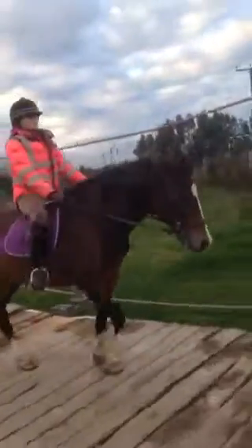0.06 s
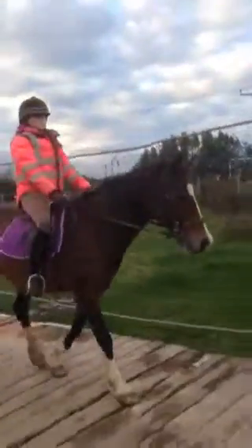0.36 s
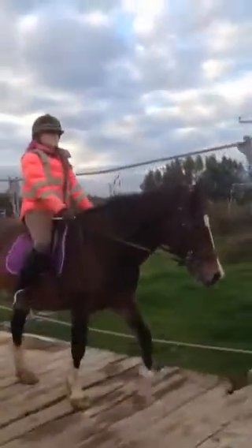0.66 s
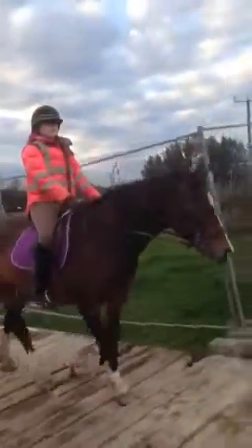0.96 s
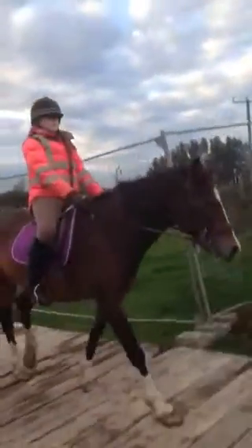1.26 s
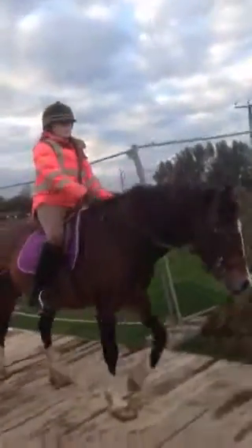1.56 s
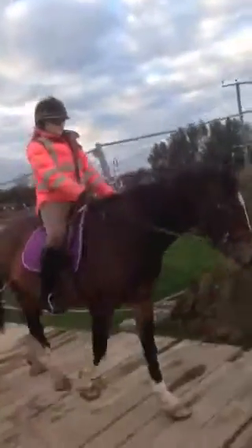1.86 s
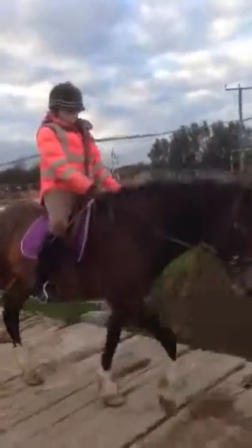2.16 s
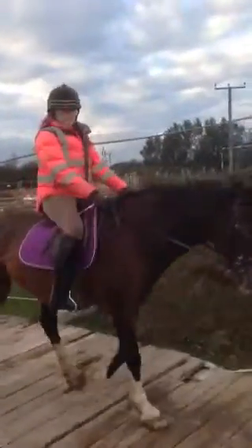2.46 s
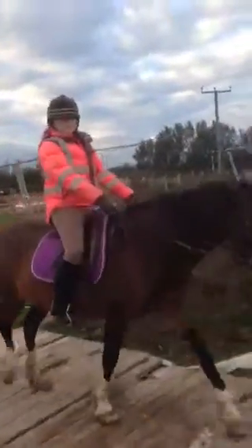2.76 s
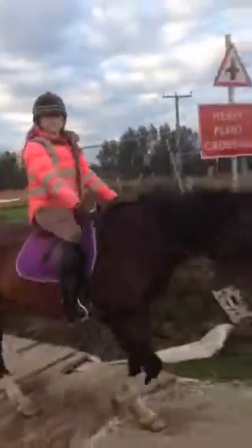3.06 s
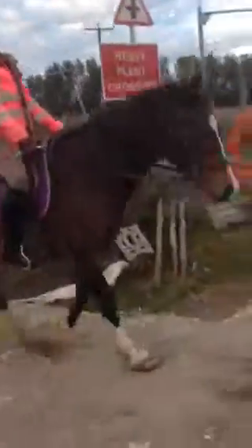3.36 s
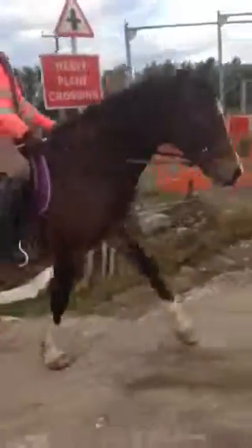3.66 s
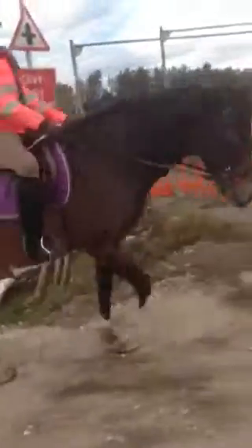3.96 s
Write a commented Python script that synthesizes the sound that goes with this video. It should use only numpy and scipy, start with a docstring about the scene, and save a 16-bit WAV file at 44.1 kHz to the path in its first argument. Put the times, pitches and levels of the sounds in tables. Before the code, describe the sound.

Horse hooves clop over loose planks and onto gritty ground as wind buffets the microphone.

```python
"""An outdoor deck of loose wooden boards, with a horse walking across it close to the microphone.
Each hoof sounds a hollow, falling knock over the wood; boards clap back or sink and boom.
The horse steps off onto ground where grit ticks and crunches; tack pings and rubs faintly.
Low gusts buffet the microphone, and a quiet hiss lies far behind it all."""
import sys
import numpy as np
from scipy import signal
from scipy.fft import rfft, irfft
from scipy.io import wavfile

SR = 44100
rng = np.random.default_rng(int(sys.argv[2]) if len(sys.argv) > 2 else 0)


def unload_wav(signal):
    """Save mono or channel-first audio to the path in sys.argv[1] as 16-bit WAV at rate SR, clipped to [-1, 1]."""
    wavfile.write(
        sys.argv[1],
        SR,
        np.round(np.clip(np.atleast_2d(signal).T, -1, 1) * 32767).astype(np.int16),
    )


N = 176400
T = np.arange(N) / SR
AGE = T[:SR // 3]  # time since an event

# distant outdoor hiss: t/s, relative level/dB
HISS_LEVELS = [(0.0, -60.5), (1.1, -59.5), (2.14, -60), (2.94, -57), (3.23, -59.5), (4.0, -56)]
# its spectrum: f/Hz, relative level/dB
HISS_COLOUR = [(25, -10), (200, 4.5), (700, 2.5), (1200, -3), (2000, -6.5), (3200, -11), (4400, -12),
               (6000, -17), (9000, -20), (15500, -21)]
# steady wind at the microphone: t/s, relative level/dB
RUMBLE_LEVELS = [(0, -53), (.35, -48.5), (.58, -49.5), (.9, -42), (1.4, -44), (1.95, -51.5), (2.8, -54.5),
                 (3.05, -44.5), (3.3, -43), (3.65, -46), (4, -59.5)]
# gusts on the microphone: peak t/s, Gaussian width/s, relative level/dB, flutter f/Hz
GUSTS = [(0.053, 0.013, -31, 131), (0.109, 0.022, -30, 187.9), (0.157, 0.0071, -24.5, 126.2),
         (0.184, 0.012, -28.5, 135.2), (0.224, 0.028, -37, 104), (0.437, 0.016, -37, 92.3),
         (0.487, 0.011, -31, 131), (0.663, 0.0056, -34, 122.8), (0.749, 0.026, -34, 200),
         (1.067, 0.012, -38.5, 128.4), (1.127, 0.028, -35.5, 187.4), (1.182, 0.008, -27, 121.9),
         (1.23, 0.012, -24.5, 187.7), (1.268, 0.019, -24, 142), (1.448, 0.016, -26.5, 111.3),
         (1.666, 0.0064, -27, 119), (1.697, 0.0073, -27, 246), (1.735, 0.014, -29, 132.4),
         (1.812, 0.025, -32.5, 161.9), (1.885, 0.0081, -25, 145.2), (2.301, 0.015, -30.5, 151.6),
         (2.999, 0.01, -31.5, 160.9), (3.075, 0.02, -36.5, 121), (3.14, 0.02, -36.5, 93.5),
         (3.201, 0.012, -33.5, 69.2), (3.351, 0.019, -28.5, 108), (3.425, 0.012, -29.5, 90),
         (3.502, 0.016, -20.5, 145), (3.614, 0.0081, -33, 69)]
# spectra of steady wind, gusts and the brighter flurry of strong gusts: f/Hz, relative level/dB
RUMBLE_COLOUR = [(20, -17), (50, 11), (90, 8), (200, -1.5), (400, -36), (900, -45.5)]
GUST_COLOUR = [(25, -50), (55, -2), (110, 1), (200, -2.5), (300, -9), (450, -25.5), (700, -38.5),
               (1400, -104.5)]
FLURRY_COLOUR = [(60, -24), (250, -12), (450, 14), (700, -19), (1400, -80)]
# metal rings on the tack: t/s, f/Hz, level/dB, overtone level/dB
TACK_PINGS = [(.918, 6002, -74, -68), (0.983, 6002, -53, -67), (1.568, 5990, -54, -70),
              (2.619, 5370, -64, -82)]
# grit, buckles and the sharp crack of some hoof knocks tick: t/s, level/dB, centre f/Hz
TICKS = [(0.0715, -34, 3960), (.513, -50.5, 7000), (.740, -33, 2480), (0.917, -46, 4080), (.935, -45, 4100),
         (0.948, -49.5, 4200), (1.189, -41, 2740), (1.3454, -31.5, 2400), (1.416, -21.5, 507),
         (1.9839, -27.5, 2470), (2.185, -43.5, 2570), (2.6053, -40, 1820), (2.896, -38.5, 5450),
         (2.912, -44, 6000), (3.061, -38.5, 3060), (3.3225, -21.5, 6700), (3.3292, -17.5, 3230),
         (3.338, -21, 3940), (3.355, -29, 2480), (3.662, -30, 3800), (3.716, -45.5, 8300)]
# saddle and jacket rub, hooves crush grit, hooves skim boards: t/s, hold/s, level/dB
RUSTLES = [(.165, 0.094, -61)]
CRUNCHES = [(1.984, .002, -39.5), (2.895, 0.013, -45.5), (3.324, 0.012, -32.5), (3.339, 0.0073, -34),
            (3.356, 0.0019, -34.5), (3.538, 0.0084, -49), (3.661, 0.0085, -46), (3.779, 0.016, -38.5),
            (3.838, .008, -48.5), (3.938, .013, -38)]
SCUFFS = [(.271, 0.01, -38.5), (.282, 0.0088, -32.5), (.32, 0.07, -48.5), (.577, 0.0021, -35.5),
          (.697, 0.003, -47), (.843, 0.019, -33.5), (1.547, 0.021, -34.5), (3.062, 0.0032, -42)]
# spectra of those three: f/Hz, relative level/dB
RUSTLE_COLOUR = [(2000, -1.5), (3500, -13), (4400, -0.5), (5500, -17), (9000, -21)]
CRUNCH_COLOUR = [(300, 5.5), (700, 13), (1500, 8), (2500, 8.5), (3400, 1), (4700, 3.5), (6500, -4),
                 (11000, -8), (15500, -16)]
SCUFF_COLOUR = [(300, -8), (560, 3), (850, 2), (1300, -7), (1900, -18.5), (2800, -29), (8000, -50)]
# a board sinks under the weight: t/s, f/Hz, relative level/dB
BOARD_THUMPS = [(.149, 146, -26), (1.082, 151, -17), (1.411, 171.6, -5.5), (1.849, 121, -44),
                (3.477, 117.6, -8.5), (3.497, 159, -14.5)]
# its modes: frequency ratio, relative level/dB, t60/s
THUMP_MODES = [(1, 4.5, 0.032), (1.5, 0.5, 0.03), (2.3, -3.5, 0.03), (4.3, -16, 0.031)]
# a hoof rocks onto its toe, or a loose board claps back: t/s, f/Hz, level/dB, t60/s
BOARD_CLAPS = [(.149, 535, -36, 0.057), (.29, 587, -35, 0.25), (.3575, 669, -20.5, 0.031),
               (0.3833, 624, -25, 0.014), (.8335, 774, -20.5, 0.018), (0.86, 430, -24, 0.055),
               (1.353, 867, -13.5, .02), (2.3817, 435, -19.5, 0.043), (2.6064, 338, -17.5, 0.031),
               (2.6085, 880, -18, 0.046), (3.0975, 539, -20, 0.05)]
# upper modes of a clap: frequency ratio, relative level/dB
CLAP_MODES = [(1.31, -12), (1.72, -18.5), (2.25, -33)]
# hoof on boards: t/s, nominal hollow f/Hz, relative hollow level/dB, ring time factor,
# then relative level/dB in each of the five wood bands
HOOF_KNOCKS = [ (0.071, 818, -14.5, .8, -47, -31.5, -26, -31.5, -32.5),
               (0.3447, 663, -20, 0.9, -39, -30.5, -25.5, -40, -46),
               (0.5873, 958, -21, .8, -41.5, -34, -39, -41.5, -51),
               (0.8292, 520, -17, 1.0, -28.5, -26.5, -31.5, -43.5, -37.5),
               (1.0808, 1220, -42, .8, -45, -48, -39.5, -51.5, -50),
               (1.348, 648, -12, 0.95, -37.5, -25, -40.5, -37.5, -40.5),
               (1.557, 866, -31.5, 1.1, -48, -40, -51.5, -54, -51),
               (1.8460, 465, -15.5, 1.0, -35.5, -27, -44, -55, -53.5),
               (2.0746, 1014, -20, .8, -39, -33, -36.5, -45, -50),
               (2.3768, 974, -20, .8, -37, -34.5, -40, -42, -49),
               (2.6020, 1052, -29.5, 1.0, -32, -29, -34, -41.5, -50),
               (3.0949, 1011, -16, .6, -26.5, -29, -22, -35.5, -44)]
# thud, wood, clack, crack and click bands: low f/Hz, high f/Hz, hold/s, tail level/dB, nominal t60/s
WOOD_BANDS = [(90.5, 324, 0.0077, 1.5, 0.15), (376, 861, 0.0082, 2, 0.092),
              (804, 2130, 0.00437, -5.5, 0.072), (1630, 4020, 0.003, -6, 0.061),
              (4100, 10200, 0.00054, -23, 0.069)]


def from_db(db):
    """Decibels to gain."""
    return 10 ** (np.asarray(db) / 20)


def rms_one(x):
    """Scale to rms 1."""
    return x / np.sqrt(np.mean(x ** 2) + 1e-20)


def fade(t60):
    """Exponential decay, 60 dB down after t60 seconds."""
    return from_db(-60 * AGE / t60)


def sine(hz, phase_turns=0):
    """One undamped mode, an event long."""
    return np.sin(2 * np.pi * (hz * AGE + phase_turns))


def add(out, s, sound):
    """Mix a sound in at time s."""
    i = max(int(s * SR), 0)
    out[i:i + len(sound)] += sound[:N - i]


def band(x, low, high, order=2):
    """Causal band-pass."""
    sos = signal.butter(order, [low, min(high, .45 * SR)], "band", fs=SR, output="sos")
    return signal.sosfilt(sos, x)


def coloured(x, colour):
    """Give a steady signal a spectrum; rms 1."""
    hz, db = np.transpose(colour)
    f = np.maximum(np.fft.rfftfreq(len(x), 1 / SR), 1)
    gain = from_db(np.interp(np.log(f), np.log(hz), db))
    return rms_one(irfft(rfft(x) * gain, len(x)))


def distant_hiss(gain_db=2.5):
    """Smooth hiss from far off, drifting a little in level."""
    level = from_db(gain_db + np.interp(T, *np.transpose(HISS_LEVELS)))
    return level * coloured(rng.standard_normal(N), HISS_COLOUR)


def wind(waver_hz=41.5, waver_depth=.25, eddy_db=-2.5, turbulence_db=-4, flurry_db=-.5, rumble_db=1.5):
    """Gusts flutter on the microphone over a steady rumble; the strong ones are brighter."""
    gust_noise, flurry_noise, rumble_noise, waver_noise = rng.standard_normal((4, N))
    pace = 1 + waver_depth * rms_one(band(waver_noise, waver_hz / 2, waver_hz * 2))
    clock = np.cumsum(pace) / SR
    eddies, power = np.zeros((2, N))
    for s, width, db, hz in GUSTS:
        swell = from_db(db) * np.exp(-.5 * ((T - s) / width) ** 2)
        eddies += swell * np.sqrt(2) * np.sin(2 * np.pi * hz * clock)
        power += swell ** 2
    force = np.sqrt(power)
    turbulence = from_db(turbulence_db) * force * coloured(gust_noise, GUST_COLOUR)
    flurry = from_db(flurry_db) * force ** 1.76 * coloured(flurry_noise, FLURRY_COLOUR)
    rumble_level = from_db(rumble_db + np.interp(T, *np.transpose(RUMBLE_LEVELS)))
    rumble = rumble_level * coloured(rumble_noise, RUMBLE_COLOUR)
    return from_db(eddy_db) * eddies + turbulence + flurry + rumble


def tack(beat_hz=82.5, twin_db=-8, overtone_ratio=2.064):
    """A small metal ring sounds two close, beating modes and an overtone."""
    out = np.zeros(N)
    for s, hz, db, overtone_db in TACK_PINGS:
        pair = (sine(hz) + from_db(twin_db) * sine(hz - beat_hz)) * fade(t60=.35)
        overtone = sine(hz * overtone_ratio) * fade(t60=.23)
        add(out, s, from_db(db) * pair + from_db(overtone_db) * overtone)
    return out


def ticks(tail_db=-24):
    """Grit, buckles and hoof cracks give sharp snaps, two octaves wide, with a faint tail."""
    out = np.zeros(N)
    envelope = fade(t60=.0093) + from_db(tail_db) * fade(t60=.1)
    for s, db, hz in TICKS:
        snap = rms_one(band(rng.standard_normal(len(AGE)), hz / 2, hz * 2, order=3))
        add(out, s, from_db(db) * snap * envelope)
    return out


def friction(strokes, colour, grains_per_s, attack_s=.00069, release_t60=.056, spread_db=3.5):
    """Many tiny grains catch and give way while two surfaces press together."""
    pressure = np.zeros(N)
    attack = np.minimum(AGE / attack_s, 1)
    for s, hold_s, db in strokes:
        release_db = -60 * np.maximum(AGE - hold_s, 0) / release_t60
        add(pressure, s, from_db(db + release_db) * attack)
    catches = (rng.random(N) < grains_per_s / SR) * rng.choice([-1, 1], N)
    sizes = from_db(spread_db * np.minimum(rng.exponential(1, N), 4))
    return pressure * coloured(catches * sizes, colour)


def board_thumps(attack_s=.0032):
    """A loose board is pressed down softly and booms."""
    out = np.zeros(N)
    attack = 1 - np.exp(-(AGE / attack_s) ** 2)
    for s, hz, db in BOARD_THUMPS:
        boom = sum(from_db(mode_db) * sine(hz * ratio, rng.random()) * fade(t60)
                   for ratio, mode_db, t60 in THUMP_MODES)
        add(out, s, from_db(db) * boom * attack)
    return out


def board_claps(attack_s=.00028):
    """A light blow sets one board ringing; its higher modes die first."""
    out = np.zeros(N)
    attack = np.minimum(AGE / attack_s, 1)
    for s, hz, db, t60 in BOARD_CLAPS:
        ring = sine(hz) * fade(t60)
        for ratio, mode_db in CLAP_MODES:
            ring += from_db(mode_db) * sine(hz * ratio, rng.random()) * fade(t60 / ratio)
        add(out, s, from_db(db) * ring * attack)
    return out


def reflected(x, delay_s=.01, echo_db=-18):
    """A sound reaches the microphone directly, then as one dull early reflection."""
    dull = band(x, 110, 1070, order=1)
    return x + from_db(echo_db) * np.interp(T - delay_s, T, dull, left=0)


def wood_vibration(low, high):
    """Dense vibration in one band, with a nearly even amplitude."""
    noise = band(rng.standard_normal(2 * len(AGE)), low, high)
    even = np.cos(np.angle(signal.hilbert(noise)))
    return rms_one(band(even, low, high, order=3)[len(AGE):])  # once the filters have settled


def hoof_contact(hold_s, tail_db, t60, attack_s, release_s=.00047, yard_db=-49):
    """Envelope of a hoof pressing briefly, the boards ringing out and the yard answering faintly."""
    attack = np.minimum(AGE / attack_s, 1)
    press = np.exp(-np.maximum(AGE - hold_s, 0) / release_s)
    tail = from_db(tail_db) * fade(t60) + from_db(yard_db) * fade(t60=.58)
    return attack * np.maximum(press, tail)


def hoof_knocks(wood_db=6, hollow_db=-1, start_ratio=1.306, end_ratio=.75, sag_s=.0057):
    """The hoof's hollow sounds a short note over the broad knock of wood; firm boards ring less."""
    out = np.zeros(N)
    sag = end_ratio + (start_ratio - end_ratio) * np.exp(-AGE / sag_s)  # pitch falls as the hoof seats
    clock = np.cumsum(sag) / SR
    for s, hz, note_db, ring_factor, *band_levels in HOOF_KNOCKS:
        note = np.sin(2 * np.pi * hz * clock)
        envelope = hoof_contact(hold_s=.00654, tail_db=8.5, t60=ring_factor * .039, attack_s=.003)
        add(out, s, from_db(note_db + hollow_db) * note * envelope)
        for db, (low, high, hold_s, tail_db, t60) in zip(band_levels, WOOD_BANDS):
            envelope = hoof_contact(hold_s, tail_db, ring_factor * t60, attack_s=.0014)
            add(out, s, from_db(db + wood_db) * wood_vibration(low, high) * envelope)
    return out


def scene():
    """One microphone: the horse close by, wind on the capsule, hiss in the distance."""
    boards = reflected(hoof_knocks()) + board_claps() + board_thumps()
    scuffs = friction(SCUFFS, SCUFF_COLOUR, grains_per_s=2700)
    grit = friction(CRUNCHES, CRUNCH_COLOUR, grains_per_s=9000) + ticks()
    rider = tack() + friction(RUSTLES, RUSTLE_COLOUR, grains_per_s=2700)
    return (boards + scuffs + grit + rider + wind() + distant_hiss())[None]


def record(dry, cutoff_hz=15500):
    """A steep low-pass cuts the top off the microphone signal."""
    return signal.sosfilt(signal.ellip(10, .1, 80, cutoff_hz, fs=SR, output="sos"), dry)


dry = scene()
out = record(dry)
unload_wav(out)
```